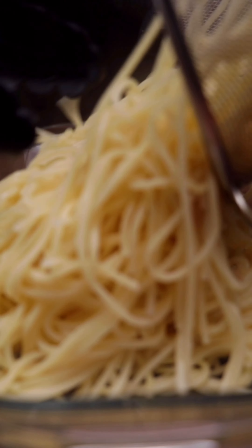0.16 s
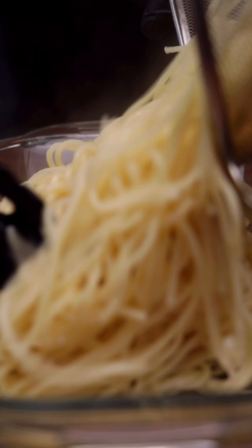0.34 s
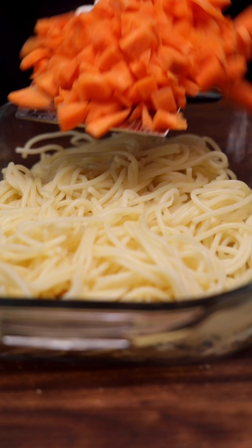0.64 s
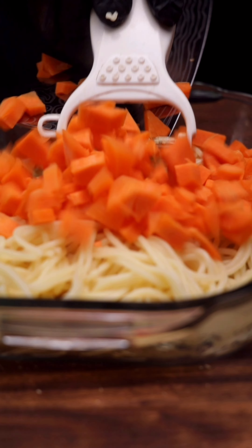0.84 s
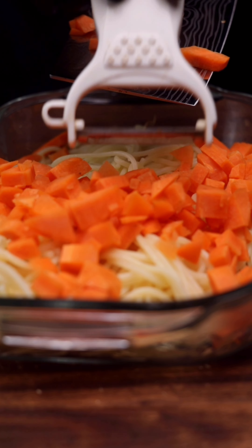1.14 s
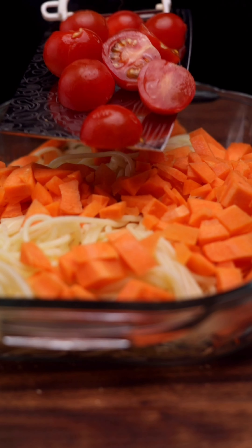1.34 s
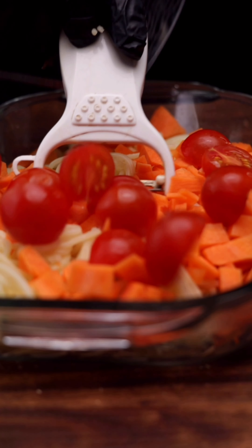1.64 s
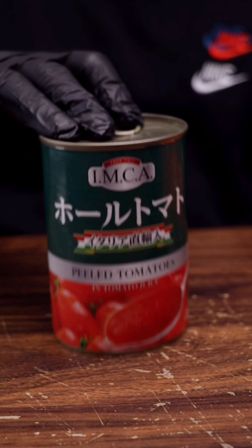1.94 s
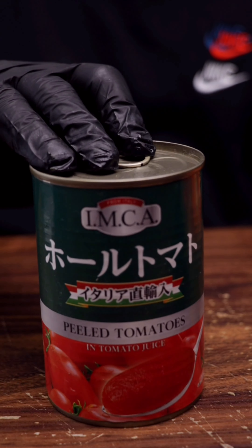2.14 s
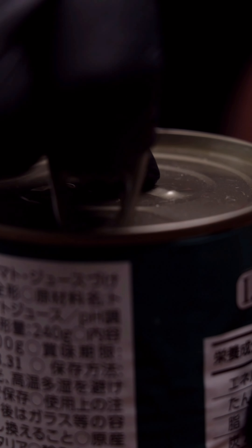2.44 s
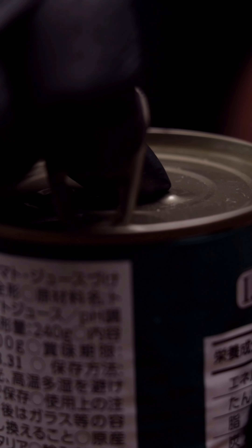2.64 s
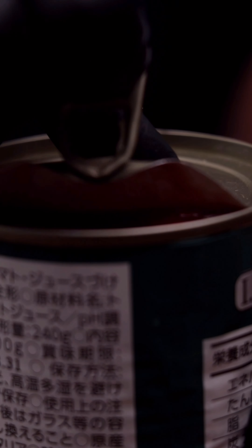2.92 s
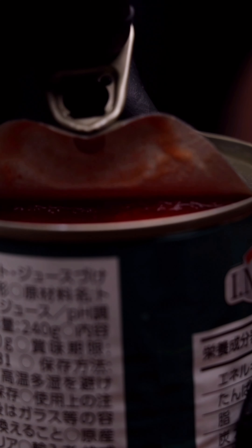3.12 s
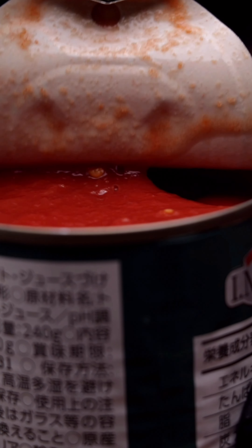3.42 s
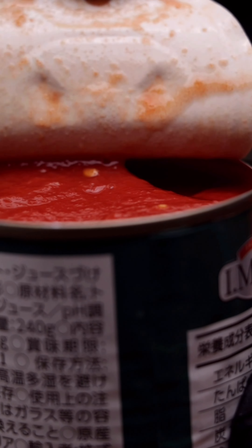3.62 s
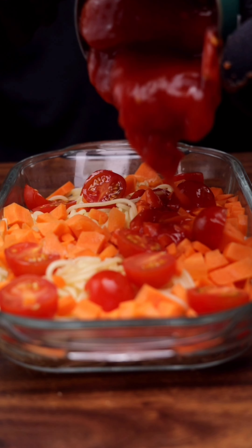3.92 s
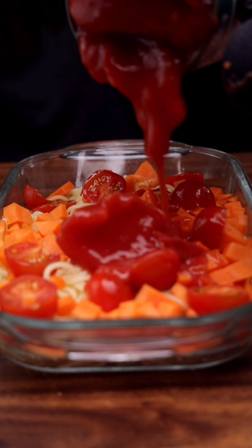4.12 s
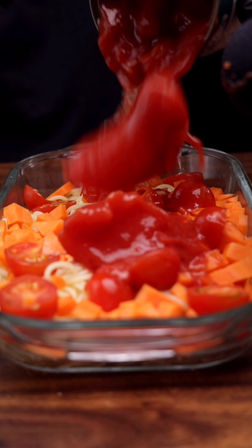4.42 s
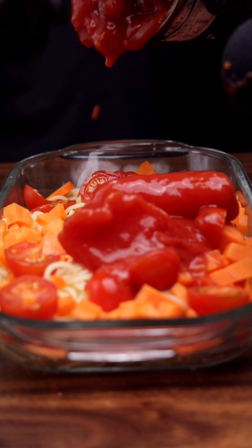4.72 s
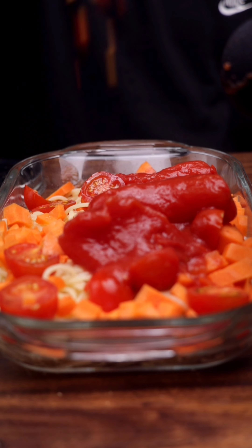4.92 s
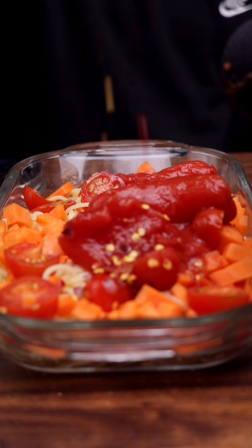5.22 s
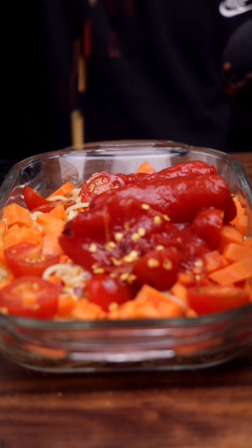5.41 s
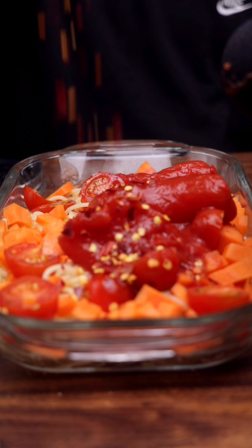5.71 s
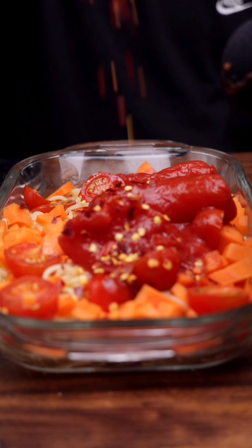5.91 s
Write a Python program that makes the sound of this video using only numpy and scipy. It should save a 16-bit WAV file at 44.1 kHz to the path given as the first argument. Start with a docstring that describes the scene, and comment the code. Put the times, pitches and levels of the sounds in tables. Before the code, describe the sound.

Close-up kitchen sounds: glass clinks, soft plops, a bright dry slide, a juicy crack and squelch, two heavy table thumps and light sprinkling.

```python
"""First come faint clinks and a quiet slide over low room noise; then pieces clink and plop, close up.
The place is a kitchen: a glass baking dish on a wooden table, a microphone near it, little reverberation.
Dry food rustles down, a soft load rushes in, something wet cracks and squelches, heavy lumps thump the
table and spice flakes patter on top; the sound fades out between the steps.
Hard objects are sums of dying modes, soft ones damped pushes and noise, loose food surges of grains."""
import sys
import numpy as np
from scipy import signal
from scipy.fft import rfft, irfft, next_fast_len
from scipy.io import wavfile
from scipy.ndimage import uniform_filter1d

SR = 44100
rng = np.random.default_rng(int(sys.argv[2]) if len(sys.argv) > 2 else 0)


def unload_wav(signal):
    """Save mono or channel-first audio to the path in sys.argv[1] as 16-bit WAV at rate SR, clipped to [-1, 1]."""
    wavfile.write(
        sys.argv[1],
        SR,
        np.round(np.clip(np.atleast_2d(signal).T, -1, 1) * 32767).astype(np.int16),
    )


N = 267246
T = np.arange(N) / SR
RING = T[:SR // 2]  # time axis of one contact, s


def amp(db):
    """Decibels to gain."""
    return 10 ** (np.asarray(db) / 20)


def unit(x):
    """Scales to rms 1."""
    return x / np.sqrt(np.mean(x ** 2) + 1e-20)


def add(mix, s, sound):
    """Mixes a sound in at time s."""
    part = mix[max(round(s * SR), 0):][:len(sound)]
    part += sound[:len(part)]


def colour(x, tone):
    """Filters by a spectrum of (f/Hz, level/dB) points, joined on a logarithmic frequency axis."""
    hz, db = np.transpose(tone)
    size = next_fast_len(len(x) + 4096)
    f = np.fft.rfftfreq(size, 1 / SR)
    gain = amp(np.interp(np.log(f + 1), np.log(hz + 1), db))
    return irfft(rfft(x, size) * gain, size)[:len(x)]


def resonate(x, hz, q):
    """One broad resonance: a two-pole band-pass of sharpness q."""
    w = 2 * np.pi * min(hz / SR, .45)
    a = np.sin(w) / (2 * max(q, .1))
    return signal.lfilter([a, 0, -a], [1 + a, -2 * np.cos(w), 1 - a], x)


def ring(modes, bright_hz):
    """Dying modes; those above the brightness of the contact are barely struck."""
    out = np.zeros(len(RING))
    for hz, db, t60 in modes:
        decay = amp(db - 60 * RING / t60)
        struck = 1 / np.hypot(1, (hz / bright_hz) ** 2)
        out += struck * decay * np.sin(2 * np.pi * hz * RING)
    return out


def patchy(x, depth_db):
    """Grains gather in small patches of pitch and time, a few hundred Hz by a few ms."""
    z = signal.stft(x, nperseg=256, noverlap=192)[2]
    field = rng.standard_normal((N // len(z), len(z)))[:z.shape[1]].T
    field = uniform_filter1d(field, size=3, axis=0)  # across pitch
    field = unit(uniform_filter1d(field, size=7, axis=1))  # across time
    return signal.istft(z * amp(depth_db * field), nperseg=256, noverlap=192)[1][:len(x)]


def burst(hz, q, decay, tail_db=-25, tail_s=0.009, skirt_q=.55):
    """A burst of tiny fractures around one pitch, with a short crumbling tail."""
    shape = np.exp(-RING / decay) + amp(tail_db) * np.exp(-RING / tail_s)
    noise = patchy(rng.standard_normal(len(RING)), depth_db=1.5) * shape
    for sharpness in (q, skirt_q, q / 4):
        noise = resonate(noise, hz, sharpness)
    return unit(noise) * np.sqrt(np.mean(shape ** 2))


def mush(hz, decay, q=0.76):
    """Dull dying noise of soft food settling."""
    shape = np.exp(-RING / decay)
    noise = rng.standard_normal(len(RING)) * shape
    noise = resonate(resonate(noise, hz, q), hz, q)
    return unit(noise) * np.sqrt(np.mean(shape ** 2))


def strikes(rows, modes, scuff_db, scuff_s, thin=0):
    """Each blow scuffs the glass and rings its modes; thin weakens the low modes of a bright blow."""
    out = np.zeros(N)
    for s, db, bright_hz in rows:
        struck = []
        for hz, mode_db, t60 in modes:
            low_loss_db = thin * 20 * np.log10(min(hz / bright_hz, 1))
            struck.append((hz, mode_db + low_loss_db, t60))
        scuff = amp(scuff_db) * burst(bright_hz, q=1.3, decay=scuff_s)
        add(out, s, amp(db) * (ring(struck, bright_hz) + scuff))
    return out


def flow(surges, lead):
    """Gain of surges that swell and ebb; lead is the share of each one's length before its crest."""
    edge_db = 21.5  # at both ends of its length a surge is this far below its crest
    power = np.zeros(N)
    for crest, db, length in surges:
        away = np.maximum((crest - T) / lead, (T - crest) / (1 - lead)) / length
        near = away < 2
        power[near] += amp(db - edge_db * away[near] ** 2) ** 2
    return np.sqrt(power)


def pour(surges, tone, lead, per_s, spread_db, wash, patch_db, grain_q=1.0):
    """Small contacts of uneven size and pitch over a wash of finer ones; two seconds, repeated."""
    gain = flow(surges, lead)
    pitches = np.geomspace(130, 14000, num=9)
    grains = np.zeros(2 * SR)
    for hz in pitches:
        chance = rng.random(2 * SR)
        size = rng.exponential(1, 2 * SR)
        noise = rng.standard_normal(2 * SR)
        happens = chance < per_s / len(pitches) / SR
        hits = happens * np.sign(noise) * amp(spread_db * np.minimum(size, 3))
        grains += resonate(unit(hits) + wash * noise, hz, grain_q)
    texture = unit(colour(patchy(grains, patch_db), tone))
    return gain * np.resize(texture, N)


# Pauses between the steps: from t/s, to t/s
PAUSE_SPANS = [(.505, .54), (1.295, 1.325), (1.783, 1.81), (2.168, 2.225), (3.897, 3.925), (4.322, 4.347),
               (4.802, 4.85)]


def fades(fade_s):
    """Gain that sinks into each pause, 30 dB down at its edges, and rises after it."""
    away = np.min([np.maximum(start - T, T - end) for start, end in PAUSE_SPANS], axis=0)
    return amp(-30 * np.clip(1 - away / fade_s, 0, 1.3) ** 2)


# Hands and food shifting on the table, low rumble in surges: crest t/s, level/dB, length/s
HANDLING_SURGES = [(.2, -53, 1.4), (.78, -33.5, 0.3), (1.0, -35.5, 0.42), (1.6, -43.5, 0.27),
                   (2.39, -42.5, 0.23), (2.85, -40, 0.76), (3.35, -42.5, 0.82), (4.6, -48.5, 0.32)]
# Spectrum of that rumble and of the room: f/Hz, level/dB
RUMBLE_TONE = [(12, -27.5), (20, 4.5), (49, 8.5), (77, 5.5), (136, -3), (359, -8), (497, -10.5), (823, -10),
               (892, -12.5), (1210, -10.5), (1390, -20), (1510, -19.5), (1700, -34), (2350, -36.5),
               (2500, -21.5), (3250, -46), (5500, -120)]
# Spectrum of the microphone's hiss: f/Hz, level/dB
MIC_HISS_TONE = [(500, 2.5), (2500, -6.5), (5300, -5), (8000, -13.5), (16000, -13)]


def room_and_handling(room_db=-54.5, hiss_db=-69, lead=.45, room_fade_s=.15, fade_share=.4):
    """Low room noise that ebbs around the pauses, rumble of handling, and a faint hiss."""
    room = amp(room_db) * fades(room_fade_s) ** fade_share
    level = np.hypot(room, flow(HANDLING_SURGES, lead))
    rumble = level * unit(colour(rng.standard_normal(N), RUMBLE_TONE))
    hiss = amp(hiss_db) * unit(colour(rng.standard_normal(N), MIC_HISS_TONE))
    return rumble + hiss


# Food sliding quietly between the landings: crest t/s, level/dB, length/s
SLIDE_SURGES = [(.09, -56.5, .45), (.35, -57, 0.24), (2.362, -41.5, 0.0616), (2.43, -52.5, .46),
                (4.56, -61.5, .4)]
# Its spectrum: f/Hz, level/dB
SLIDE_SPECTRUM = [(410, -21.5), (700, -0.5), (1400, -8.5), (1540, -9), (2430, -11.5), (5260, -9.5),
                  (10700, -27), (13700, -67), (16000, -33.5)]


def quiet_slide():
    """Sliding contact: grains nearly buried in a strong wash."""
    return pour(SLIDE_SURGES, SLIDE_SPECTRUM, lead=0.53, per_s=5200, spread_db=5, wash=5.2, patch_db=4.5)


# A faint, thin squeak: from t/s, to t/s
SQUEAK_TIMES = (2.682, 2.775)
# Its partials: f/Hz, level/dB
SQUEAK_PARTIALS = [(2347, -51), (7612, -68.5)]


def squeak(fall_db=10, waver=.003):
    """Partials sharing one slightly unsteady pitch die away together; waver is a share of the pitch."""
    start, end = SQUEAK_TIMES
    t = np.arange(0, end - start, 1 / SR)
    drift = unit(uniform_filter1d(rng.standard_normal(N), size=500))[:len(t)]
    warped_s = np.cumsum(1 + waver * drift) / SR
    tone = sum(amp(db) * np.sin(2 * np.pi * hz * warped_s) for hz, db in SQUEAK_PARTIALS)
    out = np.zeros(N)
    add(out, start, tone * amp(-fall_db * t / t[-1]) * signal.windows.tukey(len(t), .2))
    return out


# Flakes pinging off glass: t/s, level/dB, brightness f/Hz
FLAKE_PINGS = [(5.125, -57.5, 7900), (5.235, -65, 2200), (5.28, -59, 1500), (5.918, -58, 13000)]
# Modes of that glass: f/Hz, level/dB, t60/s
JAR_MODES = [(2480, -4, .25), (3751, 0, .3), (5314, -3, .2), (7087, -1, .25)]


def pings():
    """A flake hits glass: a scuff of noise and the ring of the glass modes."""
    return strikes(FLAKE_PINGS, JAR_MODES, scuff_db=9, scuff_s=0.0018)


# Spice flakes shaken on top: crest t/s, level/dB, length/s
FLAKE_SURGES = [(4.98, -66.5, 0.14), (5.07, -49.5, 0.11), (5.18, -50, 0.095), (5.28, -57.5, 0.12),
                (5.55, -56, 0.54), (6.0, -58, 1)]
# Their spectrum: f/Hz, level/dB
FLAKE_SPECTRUM = [(530, -27), (900, -13), (1260, -18), (1440, -17), (1590, -10), (3730, -6.5), (4150, -7),
                  (6030, -3.5), (7680, -13), (13800, -14), (16000, -36)]


def spice_flakes():
    """A fine patter of very uneven taps, each too heavily damped to have a pitch."""
    return pour(FLAKE_SURGES, FLAKE_SPECTRUM, lead=0.44, per_s=1300, spread_db=13, wash=0.54,
                patch_db=2.5, grain_q=0.19)


# Squelching in short strokes of uneven strength: crest t/s, level/dB, length/s
SQUELCH_SURGES = [(3.46, -41.5, 0.066), (3.53, -29.5, 0.092), (3.59, -47, 0.13), (3.675, -39.5, 0.089),
                  (3.755, -45.5, 0.09), (3.86, -58, .12)]
# Its spectrum: f/Hz, level/dB
SQUELCH_SPECTRUM = [(150, -41), (500, -5), (750, -25), (1150, -15), (1500, -9.5), (1850, 5.5), (2150, 4),
                    (2900, -23), (4350, -8.5), (5400, -26), (7500, -35), (16000, -42)]


def squelch():
    """Wet food gives way in short strokes of uneven grains."""
    return pour(SQUELCH_SURGES, SQUELCH_SPECTRUM, lead=0.56, per_s=2400, spread_db=7.0, wash=1.0, patch_db=2)


# Wet food crushed between the cracks: crest t/s, level/dB, length/s
WET_SURGES = [(2.845, -30.5, 0.034), (2.92, -29.5, 0.12), (3.04, -38, 0.094), (3.13, -44, 0.42),
              (3.255, -27, 0.18), (3.35, -32, 0.12)]
# Its spectrum: f/Hz, level/dB
WET_SPECTRUM = [(100, -7), (250, 0), (550, 0.5), (750, -5), (1200, -2.5), (2000, -4.5), (2800, -10.5),
                (5200, -15), (7500, -33), (10000, -25.5), (16000, -37.5)]


def wet_crush():
    """Crushing as uneven grains standing out of a weaker wash."""
    return pour(WET_SURGES, WET_SPECTRUM, lead=0.47, per_s=3500, spread_db=8.5, wash=0.65, patch_db=3)


# Fine dry food rustling down: crest t/s, level/dB, length/s
FINE_SURGES = [(.71, -33, 0.46), (.96, -38.5, 0.16), (1.14, -53.5, 0.091)]
# Its spectrum: f/Hz, level/dB
FINE_SPECTRUM = [(300, -21.5), (1500, -11.5), (2500, -3.5), (3600, -14.5), (5400, 5.5), (6500, 0),
                 (7500, -4), (8500, -2), (11000, -8.5), (16000, -18.5)]


def fine_rustle():
    """Dense light contacts of nearly equal size, in patches."""
    return pour(FINE_SURGES, FINE_SPECTRUM, lead=0.56, per_s=4900, spread_db=-0.5, wash=0.93, patch_db=5.0)


# Modes of the pouring bowl: f/Hz, level/dB, t60/s
BOWL_MODES = [(1071, -5, .16), (2008, -13, .3), (2202, -4, .14), (5109, -14, .26), (5717, -5, .14),
              (6470, -8, .13), (7424, -10, .14), (8024, -3, .08), (10570, -14, .12)]
# Dry food hissing brightly as it slides out of it: crest t/s, level/dB, length/s
HISSING_SURGES = [(1.44, -36.5, 0.087), (1.5, -33, 0.21), (1.625, -25.5, .14)]
# Its spectrum: f/Hz, level/dB
HISSING_SPECTRUM = [(100, -18.5), (400, -16), (900, -4), (1600, 2), (3000, -9), (5300, 9.5), (6800, -1.5),
                    (8700, 9), (11000, -2), (16000, -28)]


def hissing_slide(ring_db=-15):
    """Dense, even grains sliding over the bowl keep its modes ringing."""
    food = pour(HISSING_SURGES, HISSING_SPECTRUM, lead=.55, per_s=5400, spread_db=0.5, wash=0.81, patch_db=4.0)
    modes = ring(BOWL_MODES, 12000)
    return food + amp(ring_db) * signal.fftconvolve(food, modes / np.linalg.norm(modes))[:N]


# Knocks on the pouring bowl: t/s, level/dB, brightness f/Hz
BOWL_KNOCKS = [(1.5875, -20, 7300), (1.614, -16, 8900), (1.619, -25, 8680)]


def bowl_knocks():
    """Bright blows with a short scuff ring the modes of the bowl."""
    return strikes(BOWL_KNOCKS, BOWL_MODES, scuff_db=0, scuff_s=0.0017)


# Dry pieces snapping: t/s, level/dB, centre f/Hz
SNAP_EVENTS = [(.731, -25, 12000), (.817, -22.5, 7000), (.9208, -32, 8900), (.937, -24, 9000),
               (.981, -23.5, 3000), (1.1124, -35, 9600), (1.39, -36.5, 6950), (1.433, -26.5, 7000),
               (1.549, -21.5, 5300), (1.561, -24.5, 11000), (1.725, -43.5, 7000), (2.355, -42, 7500),
               (2.372, -41, 5900), (3.226, -25.5, 2040), (3.744, -42.5, 2500), (4.502, -42.5, 5000)]


def snaps(q=.7, decay=0.0045):
    """Short crisp fracture bursts, all of one shape."""
    out = np.zeros(N)
    for s, db, hz in SNAP_EVENTS:
        add(out, s, amp(db) * burst(hz, q, decay))
    return out


# A soft load rushing in: crest t/s, level/dB, length/s
RUSH_SURGES = [(1.9896, -13.5, 0.3)]
# Its spectrum: f/Hz, level/dB
RUSH_SPECTRUM = [(24, -47), (40, -11), (155, -12.5), (194, -1.5), (382, -3.5), (422, -7), (479, 0),
                 (570, -7.5), (751, -19), (965, -6.5), (1340, -15.5), (1550, -18), (2910, -27),
                 (4800, -33.5), (16000, -63.5)]


def soft_rush():
    """One surge of mostly wash, its contacts merged into a low rush."""
    return pour(RUSH_SURGES, RUSH_SPECTRUM, lead=0.42, per_s=6300, spread_db=-4.5, wash=6.2, patch_db=1.5)


# Hard pieces on the dish: t/s, level/dB, brightness f/Hz (harder contact is brighter)
DISH_CLINKS = [(.077, -48, 1550), (.196, -40.5, 1080), (.3973, -15.5, 4120), (.433, -27.5, 4100),
               (.7445, -4.5, 1260), (.782, -28.5, 3360), (.872, -26, 2960), (.893, -43, 3600),
               (.915, -26, 2970)]
# Modes of the glass dish: f/Hz, level/dB, t60/s
DISH_MODES = [(812, -22, .25), (1535, 1, .21), (2100, -12, .04), (2525, -5, .12), (3688, -2, .045),
              (3887, -14, .2), (5550, -4, .075), (6089, -16, .16), (6681, -15, .17), (7547, -16, .14),
              (8619, -13, .09), (10910, -12, .1), (13150, -14, .06), (14210, -13, .07)]


def clinks():
    """Hard pieces set the dish ringing; the brighter the blow, the weaker its low modes."""
    return strikes(DISH_CLINKS, DISH_MODES, scuff_db=-13, scuff_s=.0031, thin=0.71)


# Something juicy cracks, then squishes: t/s, level/dB, centre f/Hz, sharpness Q, decay/s, squish level/dB
CRACK_EVENTS = [(2.767, -19.5, 4500, .8, .0011, -41.5), (2.774, -9.5, 2500, .7, .002, -56),
                (2.809, -9.5, 3085, .9, 0.0034, -23.5), (3.3152, -7.5, 3740, .5, .0022, -10),
                (3.375, -23, 2000, .6, 0.0016, -57.5)]


def cracks(squish_hz=1320, squish_after_s=.009, squish_s=.022, spray_db=-15, spray_hz=4900):
    """A sharp fracture, then a hollow squish with a fine spray of juice."""
    out = np.zeros(N)
    for s, db, hz, q, decay, squish_db in CRACK_EVENTS:
        add(out, s, amp(db) * burst(hz, q, decay))
        spray = amp(spray_db) * burst(spray_hz, q=0.79, decay=0.017)
        squish = burst(squish_hz, q=3.3, decay=squish_s) + spray
        add(out, s + squish_after_s, amp(squish_db) * squish)
    return out


# Soft pieces landing: t/s, level/dB, pitch f/Hz
PLOP_EVENTS = [(0.3993, -17.5, 288.2), (0.424, -19.5, 205), (.703, -16.5, 382), (.7438, -3, 477),
               (.803, -10.5, 251), (.855, -10.5, 600), (.943, -12, 455), (0.9807, -5.5, 519),
               (1.005, -18, 183.9), (1.059, -12, 1790), (1.082, -20, 467), (2.3338, -7, 853.6),
               (2.595, -30.5, 88), (2.6437, -20.5, 1020), (2.7766, -12.5, 700), (2.809, -12, 451),
               (2.857, -14.5, 1080), (3.314, 0, 860), (3.735, -27.5, 101), (4.515, -23.5, 1116),
               (4.536, -8.5, 366)]


def plops(mushy=0.34, q=2.3, tick_db=-22, tick_hz=2800, heap_hz=320, heap_db=-23, heap_s=0.026):
    """A soft piece gives a faint tick, one damped push and a little mush; the heap shudders under it."""
    mush_cycles = 2  # decay of the mush in cycles, so that of low plops lasts longer
    out = np.zeros(N)
    for s, db, hz in PLOP_EVENTS:
        push = np.sin(2 * np.pi * hz * RING) * np.exp(-RING * hz * q)
        heap = amp(heap_db) * mush(heap_hz, heap_s)
        settle = mushy * mush(hz, mush_cycles / hz) + heap
        yielding = np.sin(np.pi / 2 * np.minimum(RING * hz * 4, 1))  # a quarter cycle to press in
        tick = amp(tick_db) * burst(tick_hz, q=3, decay=.0018)
        add(out, s, amp(db) * (yielding * (push + settle) + tick))
    return out


# Heavy lumps landing: t/s, level/dB, contact/s, low and upper mode of the loaded dish f/Hz (two columns),
# dish level/dB, slap level/dB, slap f/Hz, slap sharpness Q
LUMP_LANDINGS = [(4.0308, 0, 0.0028, 676, 1900, -15.5, -20.5, 2200, 0.22),
                 (4.2096, -1, 0.0026, 576, 1780, -9, -18, 1300, 0.15),
                 (4.535, -15, 0.00232, 790, 3500, -5, -15, 3700, 1.2),
                 (4.764, -31.5, 0.0032, 762, 1963, -6.5, -37, 3500, 0.89)]
# Modes of the wooden table: f/Hz, level/dB, t60/s
TABLE_MODES = [(81.5, -15, 0.32), (104, -1, 0.02), (177.8, -12, 0.11), (360, -40, 0.23), (503, -31, 0.2)]


def thumps(rebound=1.5, push_db=-3, dish_t60=0.079, overtone_db=-16):
    """A lump slaps and presses the dish, it springs back, and table and dish ring while crumbs settle."""
    out = np.zeros(N)
    for s, db, contact, dish_hz, upper_hz, dish_db, slap_db, slap_hz, slap_q in LUMP_LANDINGS:
        push = amp(push_db) * np.sin(np.pi * np.minimum(RING / contact, 1))
        loaded_modes = [(dish_hz, dish_db, dish_t60), (upper_hz, dish_db + overtone_db, dish_t60)]
        dish = ring(loaded_modes, 4500)
        slap = amp(slap_db) * burst(slap_hz, slap_q, decay=0.0031, tail_db=-22, tail_s=0.035)
        add(out, s, slap - amp(db) * push)
        # the spring-back comes this many contact times after the landing
        add(out, s + rebound * contact, amp(db) * (push + ring(TABLE_MODES, 3000) + dish))
    return out


def kitchen(x, wet_db=-21, t60=.25):
    """A short, dull reverberation of decaying noise, weak so close to the dish."""
    tone = [(100, -8), (2000, -2.0), (6000, -6.0), (16000, -21.5)]  # f/Hz, level/dB
    tail = colour(rng.standard_normal(len(RING)), tone) * amp(-60 * RING / t60)
    return x + amp(wet_db) * signal.fftconvolve(x, tail / np.linalg.norm(tail))[:N]


def scene():
    """All the ingredients in turn, in the kitchen."""
    background = room_and_handling() + quiet_slide() + squeak()
    loose = spice_flakes() + squelch() + wet_crush() + fine_rustle() + hissing_slide() + soft_rush()
    glass = pings() + bowl_knocks() + clinks()
    landings = snaps() + cracks() + plops() + thumps()
    return kitchen(background + loose + glass + landings)[None]


def record(dry, fade_s=0.048, low_cut_hz=42, edge_hz=16100):
    """The microphone sheds the deepest bass; fades around each pause, clipping at full scale, band limit."""
    low_cut = signal.butter(1, low_cut_hz, "highpass", fs=SR)
    faded = signal.lfilter(*low_cut, dry) * fades(fade_s)
    band_limit = signal.firwin(255, edge_hz, window=("kaiser", 8), fs=SR)
    return signal.oaconvolve(np.clip(faded, -1, 1), band_limit[None], "same")


dry = scene()
out = record(dry)
unload_wav(out)
```